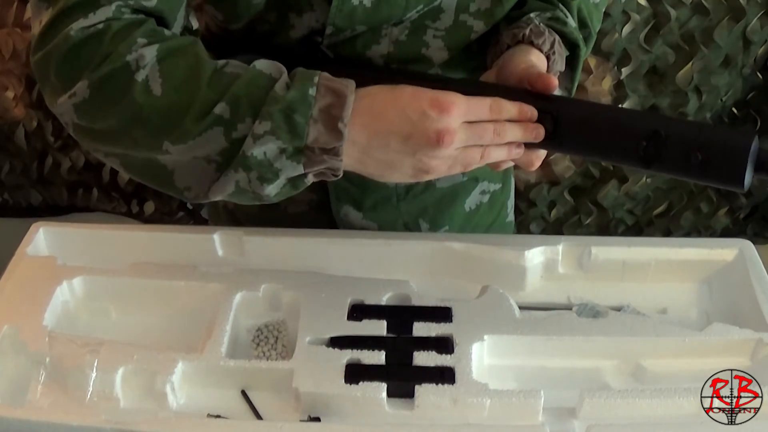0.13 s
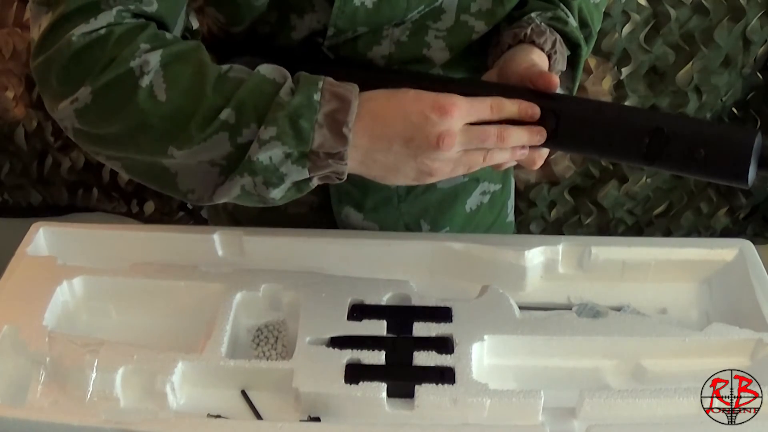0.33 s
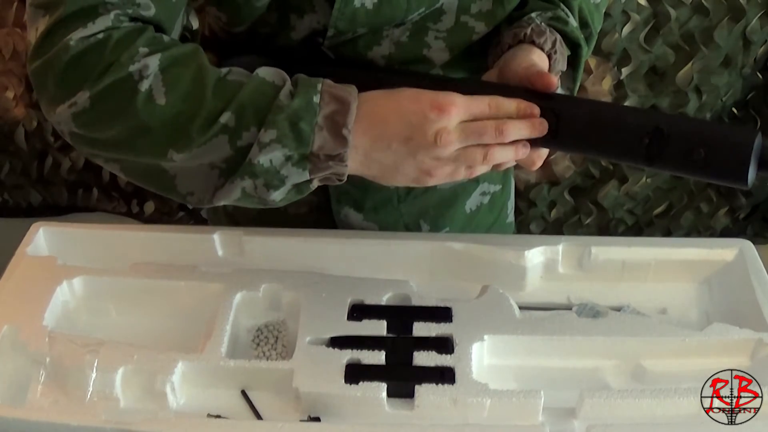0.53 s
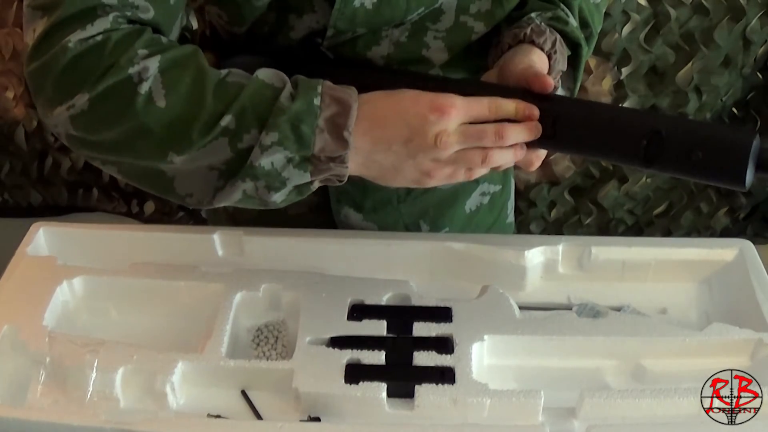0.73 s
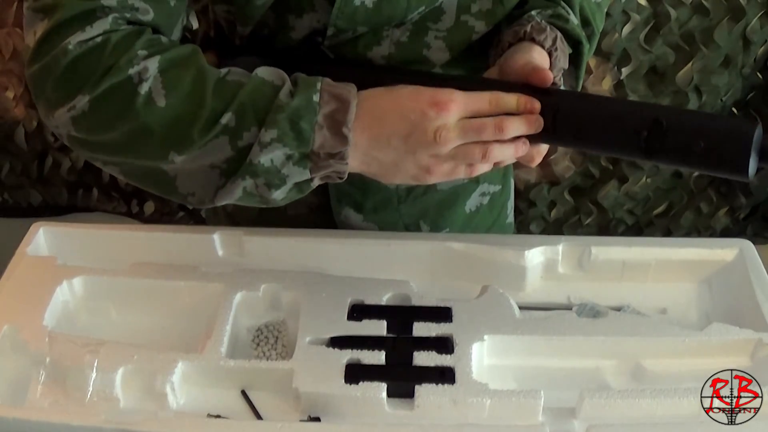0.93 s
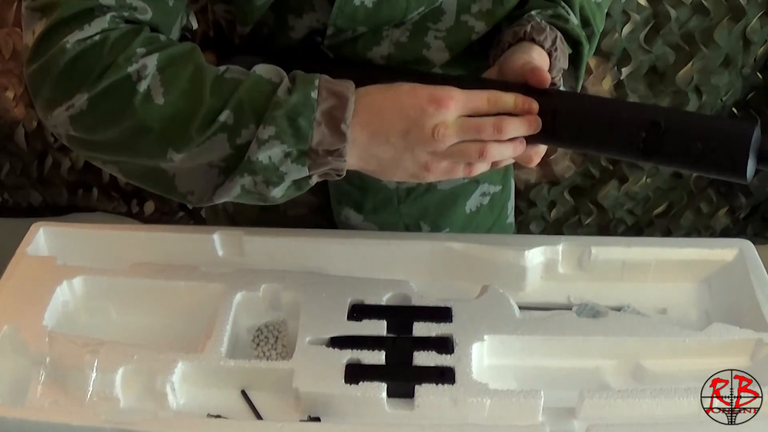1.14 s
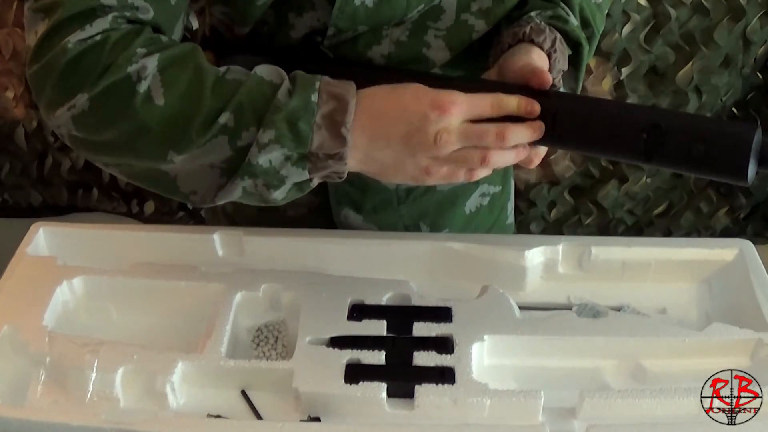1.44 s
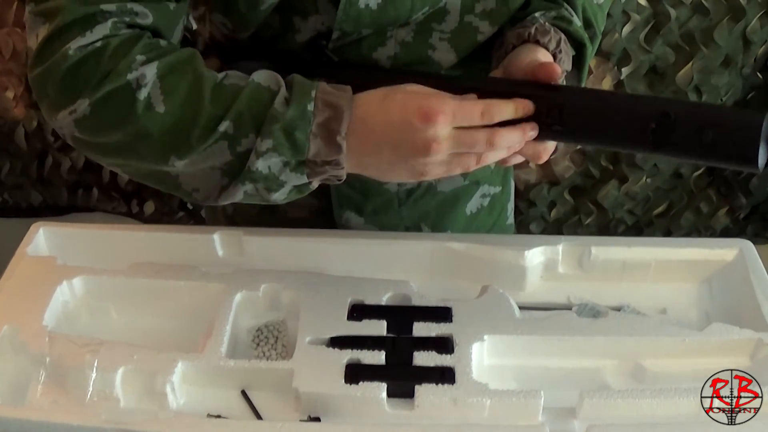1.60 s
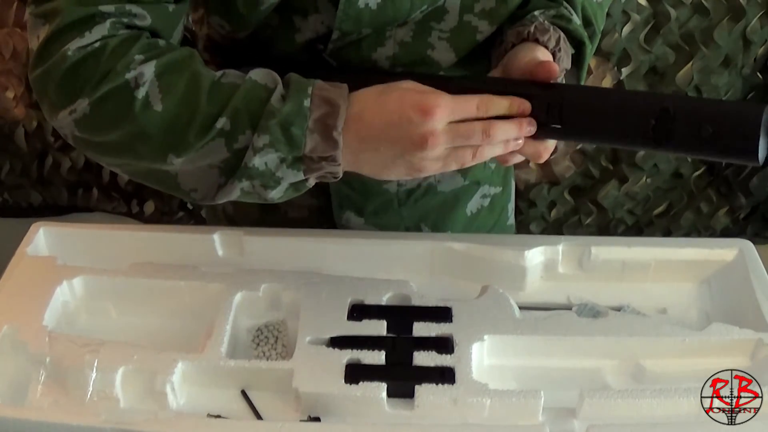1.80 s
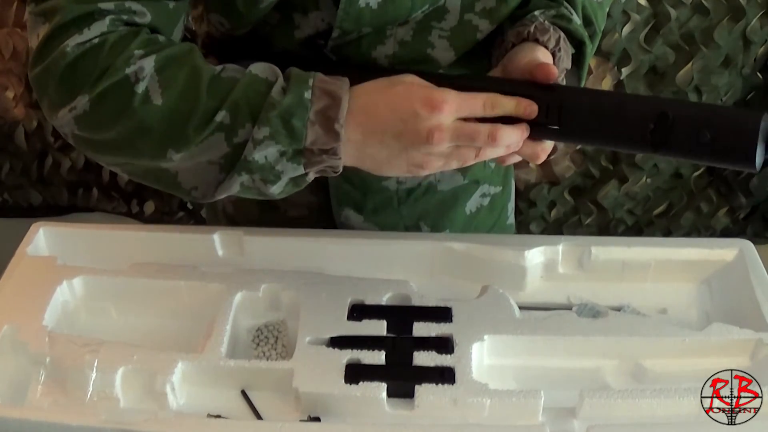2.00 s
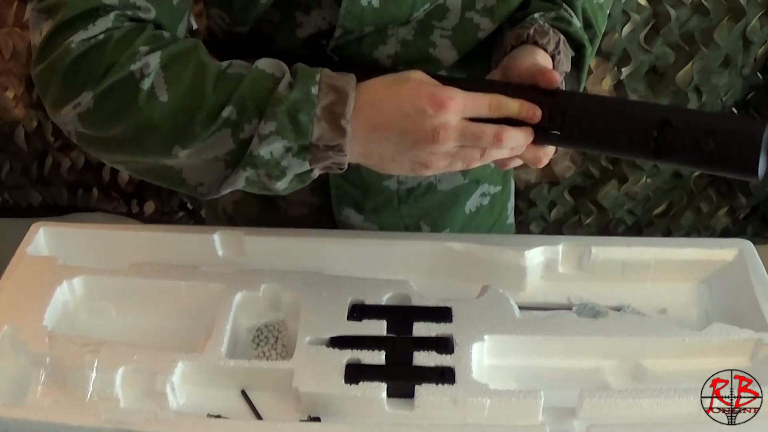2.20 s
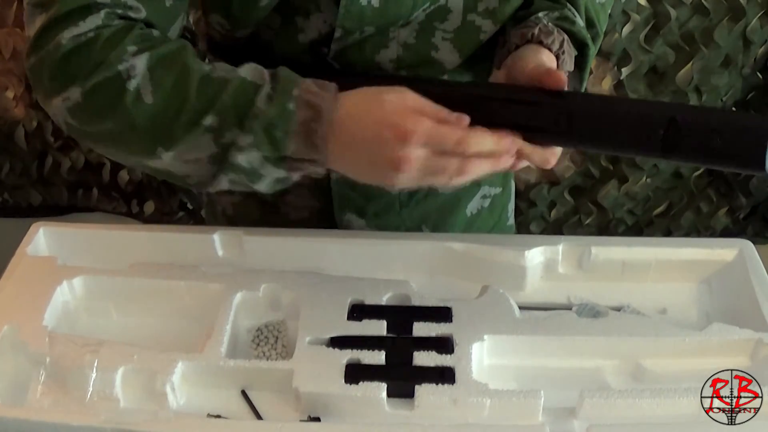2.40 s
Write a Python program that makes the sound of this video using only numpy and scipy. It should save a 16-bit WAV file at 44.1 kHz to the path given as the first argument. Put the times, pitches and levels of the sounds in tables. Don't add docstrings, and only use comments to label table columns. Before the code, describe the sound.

A magazine is fitted into a plastic airsoft rifle, close to the camera in a small quiet room. Plastic slides and light hollow knocks at 0.05-0.55 s, a sharper scraping clack at 0.83, a dull tap at 1.24, a slow soft push from 1.5 to 1.9. At 2.12 a loud steel snap rebounds, its spring and pellets rattling briefly, then faint handling over low hiss and motor ticking.

```python
import sys
import numpy as np
from scipy import signal
from scipy.fft import rfft, irfft, next_fast_len
from scipy.io import wavfile
from scipy.ndimage import uniform_filter1d

SR = 44100
rng = np.random.default_rng(int(sys.argv[2]) if len(sys.argv) > 2 else 0)


def ratio(d):
    e = np.asarray(d, float) / 20
    return 10 ** e


def store_pcm(level_fs):
    pcm = np.round(np.clip(level_fs, -1, 1) * 32767).astype(np.int16)
    wavfile.write(sys.argv[1], SR, np.atleast_2d(pcm).T)


N = 112454
SNAP_S = 2.1196


def unit(x):
    return x / np.sqrt(np.mean(x ** 2) + 1e-20)


def along(points, hz):
    f, v = np.transpose(points)
    return np.interp(np.log(hz + 1), np.log(f + 1), v)


def filtered(x, response):
    size = next_fast_len(x.shape[-1] + 4096)
    spectrum = rfft(x, size) * response(np.fft.rfftfreq(size, 1 / SR))
    return irfft(spectrum, size)[..., :x.shape[-1]]


def peaks(rows):
    def response(f):
        total = 0
        for k, (hz, width_hz, db) in enumerate(rows):
            resonance = 1j * f * width_hz / (hz * hz - f * f + 1j * f * width_hz)
            total = total + (-1) ** k * ratio(db) * resonance
        return total
    return response


def pair(size, alike):
    def mid_side_gains(hz):
        angle = np.arccos(np.clip(along(alike, hz), -1, 1)) / 2
        return np.array([np.cos(angle), np.sin(angle)])
    mid, side = filtered(rng.standard_normal((2, size)), mid_side_gains)
    return np.array([mid + side, mid - side])


def dying(noise, t60, hold_s):
    hz, t, z = signal.stft(noise, SR, nperseg=128)
    fall_db = -60 * np.maximum(t - hold_s, 0) / along(t60, hz)[:, None]
    return signal.istft(z * ratio(fall_db), SR, nperseg=128)[1][:, :noise.shape[1]]


def add(track, s, x):
    part = track[..., round(s * SR):][..., :x.shape[-1]]
    part += x[..., :part.shape[-1]]


# (frequency [Hz], density [dB per Hz])
AIR = [(15, -58), (25, -27), (249, -3), (659, 1), (1160, 0.5), (1400, -0.5), (2840, -4), (3080, -5),
       (16000, -14)]
# (frequency [Hz], left-right likeness [0-1])
AIR_ALIKE = [(30, .5), (80, 1), (180, 0.75), (350, 0.53), (700, 0.061), (1650, 0.057), (5000, 0.68),
             (15000, 1)]
AIR_DB = -54
DUCK_DB, DUCK_HOLD_S, DUCK_BACK_S = -4.5, 0.72, 0.6


def air():
    t = np.arange(N) / SR - SNAP_S
    duck_times_s = [0, .02, DUCK_HOLD_S, DUCK_HOLD_S + DUCK_BACK_S]
    duck_db = np.interp(t, duck_times_s, [0, DUCK_DB, DUCK_DB, 0])
    hiss = unit(filtered(pair(N, AIR_ALIKE), lambda hz: ratio(along(AIR, hz))))
    return ratio(duck_db) * (ratio(AIR_DB) * hiss + drum())


# (frequency [Hz], width [Hz], level [dB])
DRUM = [(1610, 70, -4), (2563, 44, 3), (2817, 35, 0.5), (3430, 173, -7)]
DRUM_RATE_HZ, DRUM_START_S, DRUM_DB = 27, 0.031, -50


def drum():
    s = np.arange(DRUM_START_S, N / SR, 1 / DRUM_RATE_HZ)
    blows = np.zeros(N)
    blows[np.round(s * SR).astype(int)] = ratio(0.5 * rng.standard_normal(len(s)))
    x = filtered(blows, peaks(DRUM))
    return ratio(DRUM_DB) * x / np.abs(x).max()


# (start [s], length [s], level [dB], brightness [dB])
STROKES = [
    (0.048, 0.21, -50.5, -5.5),
    (0.26, 0.11, -48, -3),
    (0.395, 0.032, -53, 3),
    (1.524, 0.37, -54, -1),
    (1.93, 0.13, -70, 5),
    (2.387, 0.23, -58.5, 1.5),
]
# (frequency [Hz], width [Hz], level [dB])
SLIDE = [(900, 960, 2), (2700, 660, 2), (3700, 680, -1.5)]
# (frequency [Hz], width [Hz], level [dB])
SLIDE_TOP = [(5400, 3900, -9.5), (9000, 2100, 1), (11000, 2800, -3.5)]
# (frequency [Hz], left-right likeness [0-1])
TAIL_ALIKE = [(60, 0.43), (240, 0.96), (950, 0.89), (3770, 0.77), (15000, 0.94)]
STROKE_PEAK = 0.62


def strokes():
    t = np.arange(N) / SR
    grain = ratio(0.52 * unit(uniform_filter1d(rng.standard_normal(N), 90)))
    friction = pair(N, TAIL_ALIKE) * grain
    low = unit(filtered(friction, peaks(SLIDE)))
    high = unit(filtered(friction, peaks(SLIDE_TOP)))
    out = np.zeros((2, N))
    for s, length_s, db, bright_db in STROKES:
        swell = np.interp(t, [s, s + STROKE_PEAK * length_s, s + length_s], [0, 1, 0])
        out += ratio(db) * swell * (low + ratio(bright_db) * high)
    return out


# (frequency [Hz], t60 [s])
ROOM = [(600, 0.21), (2500, 0.25), (8000, 0.17), (15000, 0.19)]
ROOM_DB, ROOM_DELAY_S = -7, .003


def room(x):
    tail = dying(pair(SR // 2, TAIL_ALIKE), ROOM, 0)
    tail = tail / np.linalg.norm(tail[0])
    delayed = np.pad(x, (round(ROOM_DELAY_S * SR), 0))
    out = ratio(ROOM_DB) * signal.fftconvolve(delayed[None], tail, axes=1)
    add(out, 0, x[None])
    return out


# (time [s], peak [dB], centre [Hz], softness [s])
KNOCKS = [(.169, -31, 1620, 0.0028), (.177, -27, 900, 0.008), (.3488, -26.5, 1730, 0.0004),
          (.3489, -30.5, 2300, 0.00024), (.349, -26.5, 1070, 0.00051), (.357, -39, 760, 0.00083),
          (.365, -48, 1020, .0015), (.377, -39, 1040, 0.0019), (.540, -36.5, 980, 0.001),
          (.549, -35.5, 2270, .001), (.556, -36, 2290, 0.001), (0.743, -42, 1000, 0.0032),
          (.808, -29, 1180, 0.0046), (.826, -26, 1930, 0.00065), (.830, -20.5, 1680, 0.00036),
          (.834, -22.5, 1470, 0.00076), (.848, -25.5, 1400, 0.003), (.829, -34, 656, 0.0011),
          (1.2443, -28, 1000, 0.0004), (1.247, -25, 790, 0.0015), (1.246, -42, 375, .003),
          (1.241, -41, 1700, .001), (.83, -36.5, 375, .003), (1.245, -37, 2380, 0.0008),
          (1.271, -50, 1150, 0.0023), (1.582, -37.5, 1170, 0.0013), (1.64, -35, 900, 0.0033),
          (1.646, -35, 960, 0.001), (1.805, -42, 900, 0.0021), (1.816, -43, 900, 0.0022),
          (2.009, -47, 1080, 0.0011), (2.105, -37.5, 830, 0.0011), (2.112, -30.5, 900, 0.0027),
          (2.122, -29, 1020, 0.0046), (2.298, -42, 900, 0.0035), (2.308, -44, 900, 0.0021),
          (2.360, -45.5, 1140, 0.0012)]
# (frequency [Hz], level [dB], t60 [s])
STOCK = [(375, -7, 0.08), (550, -3.5, 0.072), (760, -6, 0.049), (868, 0, 0.054), (1059.5, 3.5, 0.031),
         (1180, -0.5, 0.033), (1507, -6, 0.041), (1730, 9, 0.011), (2094, -6, 0.033), (2380, 2.5, 0.029),
         (3120, 0.5, 0.03)]
KNOCK_DB, KNOCK_FALL_DB = -3.5, 30


def knocks():
    out = np.zeros((2, N))
    t = np.arange(SR // 6) / SR
    for s, db, centre_hz, soft_s in KNOCKS:
        x = np.zeros(len(t))
        for hz, level_db, t60_s in STOCK:
            chance_db, phase = rng.standard_normal(2)
            off_centre_db = KNOCK_FALL_DB * np.log2(hz / centre_hz) ** 2
            envelope = ratio(level_db + chance_db - off_centre_db - 60 * t / t60_s)
            x += envelope * np.sin(2 * np.pi * hz * t + phase)
        push = 1 - np.exp(-t / soft_s)
        add(out, s, room(ratio(db + KNOCK_DB) * x * push))
    return out


TICK_T60_S, TICK_DB, TICK_TOP_HZ = .0035, -5.5, 13100
TICK_Q, HIGH_SHARPER, TICK_WIDE_DB = 2.08, 1.37, -18.5


def burst(length_s, edge_db):
    t = np.arange(SR // 20) / SR
    rise = np.minimum(3 * t / length_s, 1)
    fall = ratio(-60 * np.maximum(t - length_s, 0) / TICK_T60_S)
    return rng.standard_normal(len(t)) * rise * fall + ratio(edge_db) * (t == 0)


def edges(table, length_s, edge_db):
    out = np.zeros((2, N))
    for s, db, low_hz, high_hz, high_db in table:
        low = peaks([(low_hz, low_hz / TICK_Q, 0)])
        high = peaks([(high_hz, high_hz / TICK_Q / HIGH_SHARPER, high_db / 2)])
        wide = peaks([(8000, 12000, TICK_WIDE_DB + high_db / 2)])

        def response(f):
            top_cut = 1 + 1j * (f / TICK_TOP_HZ) ** 3
            return (low(f) ** 2 + high(f) ** 2 + wide(f)) / top_cut
        x = filtered(burst(length_s, edge_db), response)
        x = x / np.linalg.norm(x) * np.sqrt(length_s * SR)
        add(out, s, room(ratio(db + TICK_DB) * x))
    return out


# (time [s], peak [dB], low centre [Hz], high centre [Hz], high over low [dB])
TICKS = [(.1897, -24, 3000, 8870, -3.5), (.1890, -28, 4950, 6650, -1.5), (.3487, -27, 5330, 7550, -3.5),
         (.3489, -34, 3400, 10000, 0), (.3533, -26.5, 3860, 8100, 0), (.5470, -23, 3700, 12500, -5),
         (.5478, -25.5, 4200, 6600, 2.5), (.5480, -36, 2600, 13200, -5), (.8263, -12, 4040, 7300, 7.5),
         (.8270, -16, 2460, 13600, -3), (.8274, -14.5, 4600, 9600, 2.5), (.8254, -19.5, 6100, 11000, -2),
         (.8305, -21, 4050, 6500, 1), (.8322, -23, 4960, 8500, -6), (1.0544, -44, 4470, 9400, 19),
         (1.2443, -28, 3370, 9000, -5), (1.2448, -29.5, 3770, 10500, -4), (1.5087, -36.5, 3480, 9450, 23),
         (1.5367, -34, 2800, 8300, -4), (1.5784, -34.5, 6040, 11500, 2), (1.5787, -34, 4000, 9300, 6),
         (2.1286, -19, 3600, 14800, 3), (2.1378, -20, 3700, 10450, -3), (2.1653, -14.5, 3640, 10000, 4),
         (2.307, -44.5, 4200, 8000, -4)]


def ticks():
    return edges(TICKS, length_s=0.001, edge_db=17)


# (time [s], peak [dB], low
# centre [Hz], high centre [Hz], high over low [dB])
SCRAPES = [(.408, -39, 3350, 10900, -2), (.5405, -30, 4000, 8500, -12), (.8121, -20, 4070, 7750, 5),
           (.8134, -19.5, 11400, 9300, 11), (.8165, -26.5, 3700, 8000, -6), (.8218, -23, 4360, 9100, 6),
           (.8243, -13, 4180, 9000, 6), (1.2403, -36, 1750, 8000, 3), (2.104, -48, 3550, 8500, -1),
           (2.111, -43, 3700, 9000, -3), (2.1175, -40, 12000, 10040, 3), (2.1445, -15, 3320, 7500, -8),
           (2.149, -20, 3250, 7500, 0)]


def scrapes():
    return edges(SCRAPES, length_s=0.0022, edge_db=2)


# (frequency [Hz], width [Hz], level [dB])
CATCH = [(3000, 620, -4), (3700, 380, 2), (4690, 630, -5.5), (6100, 500, -2), (7530, 280, 4),
         (9300, 780, -9), (11700, 450, 1), (12000, 260, -1), (13400, 380, -2), (14800, 400, -7)]
# (frequency [Hz], width [Hz], level [dB])
REBOUND = [(6100, 470, -4.5), (8870, 250, -2), (10240, 420, 4), (14500, 450, -12)]
SNAP_DB = -4
REBOUND_S, REBOUND_DB, REBOUND_PUSH_S = .0011, -1.5, .0006


def catch():
    out = np.zeros((2, N))
    t = np.arange(SR // 2) / SR
    impulse = 1. * (t == 0)
    crack = filtered(impulse, peaks(CATCH))
    again = filtered(impulse, peaks(REBOUND)) * (1 - np.exp(-t / REBOUND_PUSH_S))
    add(out, SNAP_S, ratio(SNAP_DB) * crack[None] / np.abs(crack).max())
    add(out, SNAP_S + REBOUND_S, ratio(REBOUND_DB) * again[None] / np.abs(again).max())
    rise = np.minimum(t / .004, 1)
    add(out, SNAP_S, rise * rattle(len(t)))
    add(out, SNAP_S, rise * wires(t)[None])
    return out


# (frequency [Hz], density [dB per Hz])
RATTLE = [(350, -68), (600, -33), (868, -14.5), (1740, -18), (2110, -13.5), (3270, 0), (4310, -11.5),
          (10200, 1.5), (15800, -16.5)]
# (frequency [Hz], width [Hz], level [dB])
SPRING = [(3320, 54, -2.5), (3700, 230, -3.5), (6080, 180, -3), (7160, 56, -1), (7490, 43, 6),
          (8890, 26, 8), (8900, 65, 0), (9860, 49, 5.5), (10900, 27, 5), (11600, 380, -6), (13230, 95, -2),
          (14930, 150, -5)]
# (frequency [Hz], t60 [s])
RATTLE_T60 = [(800, 0.32), (2500, 0.26), (8000, 0.25), (15000, 0.18)]
RATTLE_DB, RATTLE_HOLD_S, RING_DB, SPIKE_DB = -20, 0.035, -3, 0


def rattle(size):
    spikes = ratio(SPIKE_DB * unit(uniform_filter1d(rng.standard_normal(size), 30)))
    pellets = unit(filtered(pair(size, TAIL_ALIKE) * spikes, lambda hz: ratio(along(RATTLE, hz))))
    spring = unit(filtered(pair(size, TAIL_ALIKE), peaks(SPRING)))
    return ratio(RATTLE_DB) * dying(pellets + ratio(RING_DB) * spring, RATTLE_T60, RATTLE_HOLD_S)


# (frequency [Hz], level [dB], t60 [s])
WIRES = [(2632, -42, 0.65), (2165, -34, 0.26), (868, -40, 0.29), (7496, -31, 0.19), (9300, -25, .22),
         (10730, -28, .25), (8740, -32, .22)]
WIRES_HELD_S = 0.19


def wires(t):
    ring = sum(ratio(db - 60 * t / t60_s) * np.sin(2 * np.pi * hz * t) for hz, db, t60_s in WIRES)
    return ratio(-400 * np.maximum(t - WIRES_HELD_S, 0)) * ring


STOCK_LOW_HZ, LEFT_DB = 280, 0.45


def scene():
    floor = air()
    hands = strokes() + knocks() + ticks() + scrapes() + catch()
    hands = filtered(hands, lambda f: (1j * f / (STOCK_LOW_HZ + 1j * f)) ** 2)
    return hands * ratio(np.array([[-LEFT_DB], [LEFT_DB]])) + floor


def low_pass(x):
    return signal.sosfilt(signal.butter(12, 16800, fs=SR, output="sos"), x)


TOP_HZ = 15530


def record(dry):
    mix = filtered(dry, lambda hz: 1 / (1 + (hz / TOP_HZ) ** 80))
    return low_pass(mix)


dry = scene()
out = record(dry)
store_pcm(out)
```